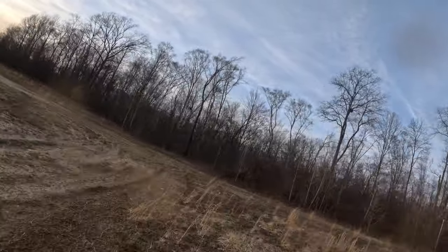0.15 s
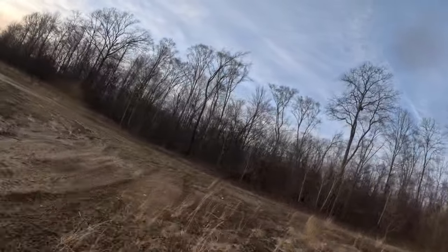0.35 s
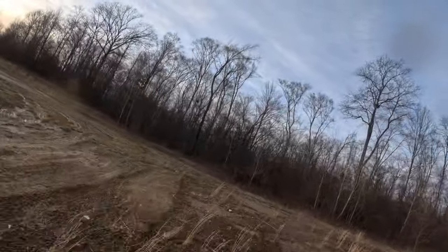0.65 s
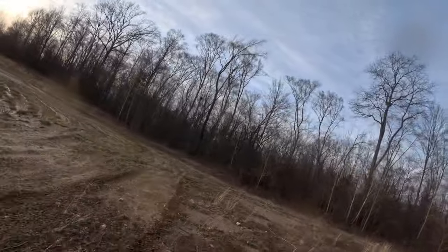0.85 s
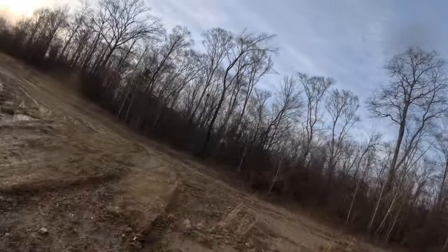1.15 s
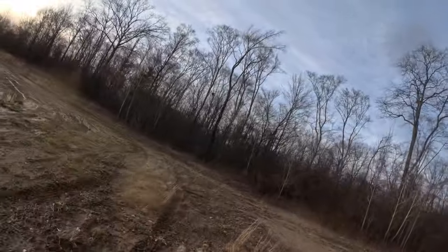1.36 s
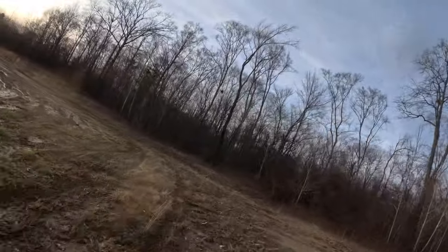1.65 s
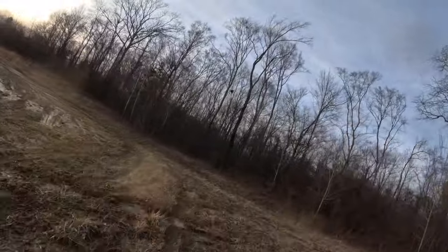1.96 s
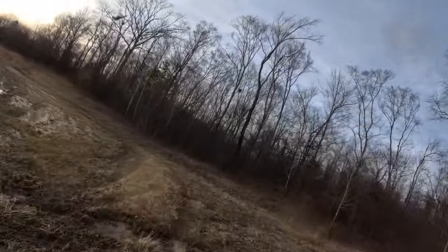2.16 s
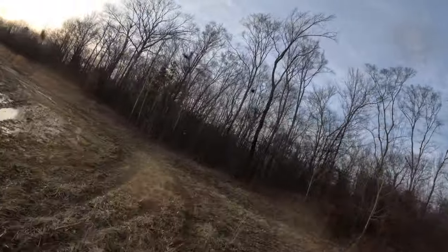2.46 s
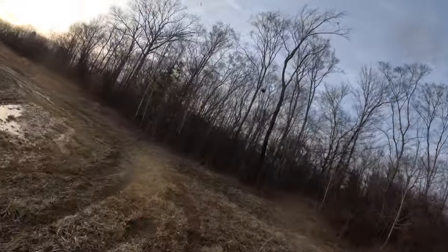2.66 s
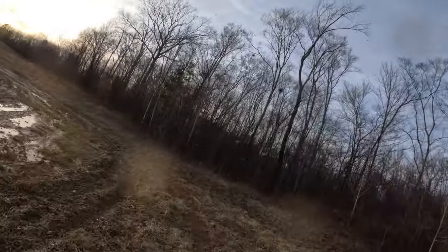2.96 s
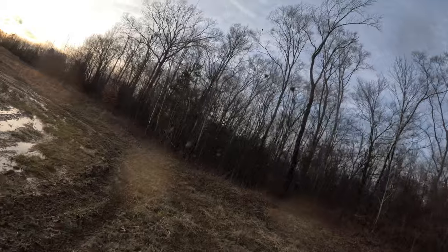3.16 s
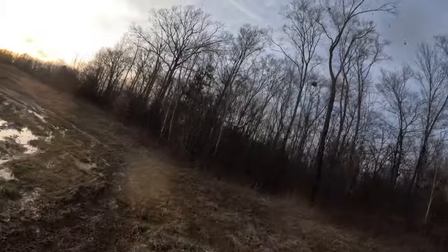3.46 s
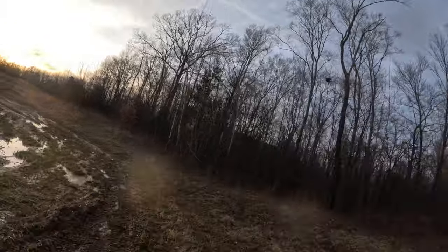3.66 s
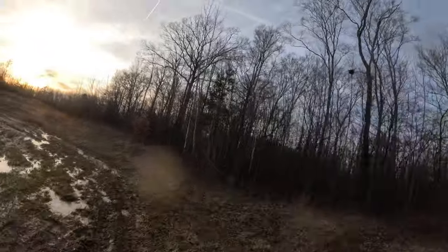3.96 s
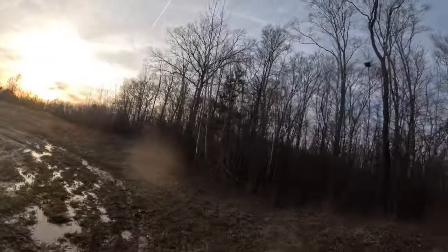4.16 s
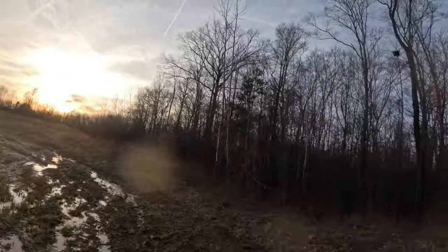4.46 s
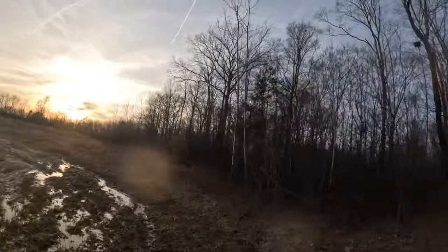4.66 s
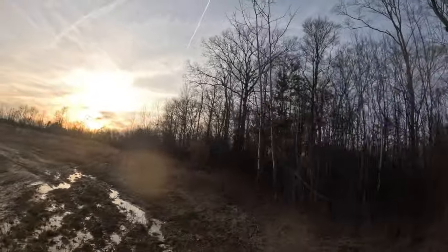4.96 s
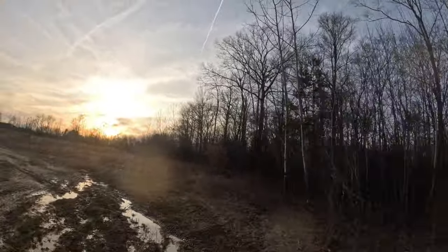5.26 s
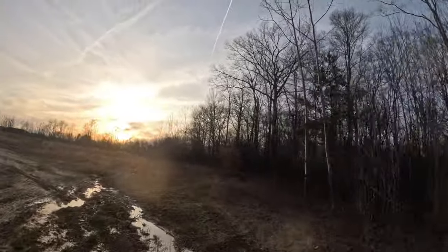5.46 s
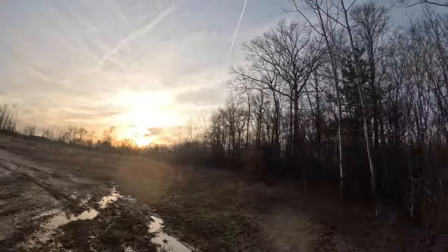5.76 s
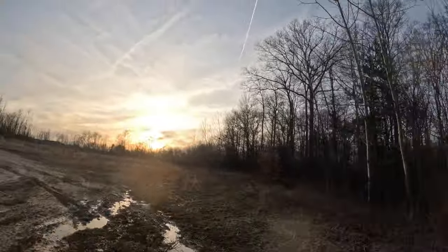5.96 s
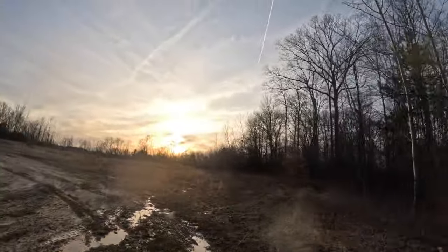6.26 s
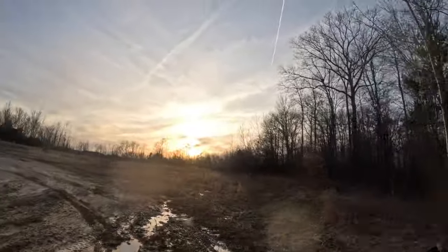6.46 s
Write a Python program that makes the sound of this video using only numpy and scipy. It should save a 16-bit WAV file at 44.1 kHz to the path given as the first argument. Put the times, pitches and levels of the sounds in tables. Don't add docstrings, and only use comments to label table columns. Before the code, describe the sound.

Close, dull onboard sound of a small twin-cylinder off-road vehicle outdoors. Its coarse, airy growl sags in pitch over the first two seconds, recovers slightly around three, then drifts lower. Ruts bring bursts of panel rattle, dry taps and low chassis thuds; a drive belt chirps faintly. A faint tyre hum comes midway, with thin wet spray later, over lumpy wind rumble.

```python
import sys
import numpy as np
from scipy import signal
from scipy.fft import rfft, irfft, next_fast_len
from scipy.io import wavfile
from scipy.ndimage import uniform_filter1d, map_coordinates

SR = 44100
rng = np.random.default_rng(int(sys.argv[2]) if len(sys.argv) > 2 else 0)


def generate_wav(signal):
    frames = np.transpose(np.atleast_2d(signal))
    scaled = np.clip(frames, -1, 1) * 32767
    pcm = np.round(scaled).astype(np.int16)
    wavfile.write(sys.argv[1], SR, pcm)


def field_ratio(decibels):
    return 10 ** (np.asarray(decibels, dtype=float) / 20)


N = 291942

# time in seconds, pace in dB.
PACE = [(0, 6.5), (.13, 5.5), (.45, 4.5), (.8, 2.5), (1.25, 2.5), (1.6, -0.5), (2.15, 0.5), (2.3, -.5),
        (3.3, -2), (3.75, -3), (4.3, -3), (4.8, -4), (5.4, -2.5), (6.1, -3.5), (6.45, -4.5), (6.62, -4)]


def unit(x):
    return x / np.sqrt(np.mean(x ** 2) + 1e-20)


def curves(rows):
    s, *columns = np.transpose(rows)
    return [np.interp(np.arange(N) / SR, s, column) for column in columns]


def swells(rows):
    t = np.arange(N) / SR
    total = 0
    for middle, length, height in rows:
        total = total + height * np.exp(-np.abs(2 * (t - middle) / length) ** 3)
    return total


def wobble(rate):
    knots = rng.standard_normal(int(N * 40 / SR) + 4)
    return map_coordinates(knots, [np.arange(N) * min(rate, 40) / SR])


def tone(hz):
    return 2 * np.pi * np.cumsum(hz) / SR


def thud(t, hz, peak_s):
    envelope = t / peak_s * np.exp(1 - t / peak_s)
    return envelope * np.sin(2 * np.pi * hz * t)


def band(x, low_hz, high_hz):
    sos = signal.butter(2, [low_hz, high_hz], "bandpass", fs=SR, output="sos")
    return signal.sosfilt(sos, x)


def shaped(x, spectrum, peaks=()):
    m = next_fast_len(N + 8192)
    hz = np.fft.rfftfreq(m, 1 / SR)
    f, db = np.transpose(spectrum)
    shape_db = np.interp(np.log(hz + 1), np.log(f + 1), db)
    for centre, width, lift_db in peaks:
        shape_db += lift_db / (1 + (2 * (hz - centre) / width) ** 2)
    return irfft(rfft(x, m) * field_ratio(shape_db), m)[..., :N]


def coloured(x, spectrum, peaks=()):
    return unit(shaped(x, spectrum, peaks))


def patchy(patchy_db):
    z = signal.stft(rng.standard_normal(N), nperseg=512)[2]
    field = uniform_filter1d(rng.standard_normal(z.shape), size=7, axis=0)
    field = uniform_filter1d(field, size=8, axis=1)
    return signal.istft(z * field_ratio(patchy_db * unit(field)), nperseg=512)[1][:N]


def grains(share):
    size = field_ratio(3.5 * np.minimum(rng.exponential(size=N), 4.5))
    struck = rng.random(N) < .08
    return patchy(1.5) + share * unit(rng.standard_normal(N) * size * struck)


def shake_db():
    # middle in seconds, length in seconds, change in dB.
    gusts = [(.08, 0.12, -8), (.3, 0.28, 0), (.5, .1, -1), (.86, 0.092, -6), (1.71, .08, 6),
             (1.92, 0.13, 4.5), (2.13, 0.15, 5.5), (2.6, .1, 1), (2.85, 0.33, -2.5), (3.1, .08, -3),
             (3.45, 0.36, 3), (4.38, 0.22, -5), (4.58, 0.09, 3), (4.9, 0.12, 3.5), (5.05, .1, 2.5),
             (5.25, 0.26, 0), (5.66, 0.16, -17), (6.13, 0.16, -21), (6.28, .12, -3)]
    return -28.5 + 1.1 * curves(PACE)[0] + swells(gusts)


def jolts():
    # start in seconds, length in seconds, jolt in dB.
    ruts = [(0, 0.026, -1), (0.128, .06, 5), (0.713, 0.16, 4), (0.987, 0.09, 6), (1.155, .05, 4.5),
            (1.303, .06, 3), (1.422, 0.043, 5), (1.634, .11, 6.5), (2.017, 0.12, 5), (2.127, 0.12, 2),
            (2.345, 0.081, 7), (2.508, .11, 9.5), (2.7, 0.079, 7), (2.834, 0.081, 4.5), (3.019, .08, 4.5),
            (3.248, 0.08, 4.5), (3.336, 0.092, 5.5), (3.767, 0.12, 8), (3.896, 0.11, 7), (3.964, .05, 1.5),
            (4.08, .06, 1.5), (4.288, .14, 3.5), (4.566, 0.17, 3), (4.856, .12, 3.5), (5.04, 0.26, 3),
            (5.24, 0.13, 2.5), (5.938, 0.037, 2), (6.057, 0.092, 2.5)]
    t = np.arange(N) / SR
    rise_s = 0.01
    total = 0
    for start, length, jolt_db in ruts:
        hit = (1 + np.tanh((t - start) / rise_s)) / 2
        let_go = np.exp(-np.clip((t - start) / length, 0, 9) ** 3)
        total = total + jolt_db * hit * let_go
    return total


def buffeting():
    # pitch in Hz, level in dB.
    shake = [(3, -18.5), (6, -8), (27, -5), (55, 1.5), (80, 0.5), (125, -4), (160, -10.5), (230, -13.5),
             (400, -38.5), (2000, -78), (9000, -140)]
    lumps = field_ratio(1.6 * wobble(9))
    return field_ratio(shake_db() + 4.5) * coloured(lumps * rng.standard_normal(N), shake)


def tyres():
    # time in seconds, pitch in Hz, level in dB.
    tread = [
        (2.3, 385, -70),
        (2.6, 385, -37),
        (3, 398, -40.5),
        (3.6, 399.4, -35.5),
        (4, 380, -39.5),
        (4.6, 378.6, -36.5),
        (5.3, 368, -46),
        (5.7, 356.3, -48.5),
        (5.9, 365, -64.5),
    ]
    # time in seconds, spray in dB.
    wet = [
        (0, -100),
        (3.2, -85.5),
        (3.84, -91),
        (3.93, -80.5),
        (4.3, -74.5),
        (5.0, -74),
        (6.62, -75),
    ]
    # middle in seconds, length in seconds, extra spray in dB.
    puddles = [
        (3.42, .33, 12),
        (4.65, .15, 1),
        (5.19, .16, 3.5),
        (6.1, 0.11, 4),
    ]
    # pitch in Hz, level in dB.
    mist = [(10800, -34.5), (11400, -17.5), (11700, -5.5), (12200, -7), (12800, -4.5), (13200, -12.5),
            (14800, -21.5), (15700, -34)]
    hz, hum_db = curves(tread)
    hum = field_ratio(hum_db + 2.3 * wobble(6)) * np.sin(tone(hz) + 0.35 * wobble(6.3))
    spray_db = curves(wet)[0] + swells(puddles) + 24 + 1.2 * wobble(14)
    return hum + field_ratio(spray_db) * coloured(patchy(1.5), mist)


def rattle():
    # pitch in Hz, level in dB.
    panel_colour = [(290, -28), (500, -8), (900, -5), (1500, -6.5), (2720, -13.5), (4000, -15.5),
                    (5640, -23.5), (7300, -28), (8300, -51.5), (16000, -110)]
    # pitch in Hz, level in dB.
    grit_colour = [(6500, -29.5), (7600, -3), (8300, -5), (10000, -0.5), (11000, -6), (12500, -5),
                   (13300, -19), (14200, -48), (15700, -88.5)]
    jolt_db, tremble = jolts(), wobble(30)
    panel_db = -50 + 0.4 * curves(PACE)[0] + jolt_db + 0.72 * tremble + 11.5
    grit_db = -78 + 0.63 * jolt_db + 1.2 * tremble + 23
    panels = field_ratio(panel_db) * coloured(grains(share=0.35), panel_colour)
    grit = field_ratio(grit_db) * coloured(grains(share=0.38), grit_colour)
    return panels + grit


def clods():
    # time in seconds, peak in dB, ring in Hz, bright part in
    # dB.
    hits = [(0.002, -33, 2990, -40.5), (0.9426, -30, 2360, -51), (1.1159, -29, 2239, -70.5),
            (1.311, -29.5, 4600, -72), (1.326, -27.5, 4700, -68), (1.341, -21, 2570, -48),
            (1.422, -35.5, 2514, -52), (2.0224, -16.5, 2698, -62), (2.027, -24, 2600, -66),
            (2.059, -25, 2520, -73), (2.095, -30, 2400, -72), (2.164, -29, 2200, -57),
            (2.346, -33, 2350, -75), (2.705, -26, 2690, -63), (2.8599, -26, 2200, -67),
            (3.258, -26, 2160, -64.5), (3.7568, -40, 2580, -68), (3.9896, -24.5, 2980, -71),
            (4.83, -34, 3500, -73), (4.87, -32, 2900, -72), (4.955, -25.5, 3220, -67),
            (5.0407, -27, 2350, -60.5), (5.046, -26, 3200, -70), (5.162, -30, 3274, -70),
            (5.1834, -25.5, 3150, -64), (5.2635, -23, 2755, -61), (5.318, -29, 3330, -64)]
    ring, crack = np.zeros(N + SR), np.zeros(N + SR)
    t = np.arange(SR // 10) / SR
    for s, peak_db, hz, bright_db in hits:
        place = slice(round(s * SR), round(s * SR) + len(t))
        burst = (1 - np.exp(-t / 0.0015)) * rng.standard_normal(len(t))
        tap = field_ratio(peak_db + 4 - 60 * t / 0.045) * burst
        ring[place] += field_ratio(peak_db - 4) * thud(t, hz, .0007)
        ring[place] += band(tap, .8 * hz, 1.35 * hz)
        crack[place] += field_ratio(bright_db + 31.5 - 60 * t / 0.01) * burst
    crack = band(band(crack, 6500, 13000), 6500, 13000)
    return (ring + crack)[:N]


def knocks():
    # time in seconds, peak in dB, ring in Hz.
    blows = [(1.676, -20, 700), (1.694, -17, 560), (1.704, -13, 637), (1.718, -18, 590),
             (1.834, -14.5, 573), (3.031, -33, 592), (3.255, -29, 500), (3.391, -23, 600),
             (3.785, -17, 974), (4.296, -20.5, 1140), (4.333, -26, 592), (4.419, -18, 826),
             (4.484, -22, 509), (4.579, -31, 616), (4.913, -21.5, 1420), (5.159, -25, 605),
             (5.253, -30, 549), (4.575, -22, 1500), (5.12, -24, 1450), (5.293, -18, 1170), (5.37, -23, 945)]
    out = np.zeros(N + SR)
    t = np.arange(SR // 10) / SR
    for s, peak_db, hz in blows:
        out[round(s * SR):][:len(t)] += field_ratio(peak_db - 6.5) * thud(t, hz, 0.0018)
    return out[:N]


def belt():
    # middle in seconds, length in seconds, pitch in Hz, level in dB.
    slips = [
        (.1, 0.46, 1000, -44),
        (1.809, 0.13, 1110, -42.5),
        (2.12, .36, 990, -41.5),
        (3.38, 0.44, 1097, -43.5),
        (4.149, .1, 1010, -43.5),
        (6.434, 0.43, 1100, -43.5),
    ]
    t = np.arange(N) / SR
    song = 0
    for s, length, hz, db in slips:
        note = np.exp(2j * np.pi * hz * t) + 0.16 * np.exp(3 * 2j * np.pi * hz * t)
        song = song + swells([(s, length, field_ratio(db))]) * note
    fuzz = np.exp(2.6j * wobble(40))
    return field_ratio(3.2 * wobble(35)) * np.sqrt(2) * np.imag(song * fuzz)


def exhaust_boom(hz, boom_db, phase, rough):
    # multiple of firing rate, level in dB, drift in dB.
    half_orders = [
        (1.5, -48.5, 6.5),
        (2.5, -58.5, 2.5),
    ]
    # pitch in Hz, level in dB.
    pipe = [(177, -47), (183, -29), (197, -26.5), (215, -32.5), (235, -44), (270, -36.5), (292, -37),
            (320, -47),
            (342, -39.5), (385, -53), (420, -44), (450, -45.5), (490, -52), (540, -46), (580, -49),
                 (700, -53.5)]
    # middle in seconds, length in seconds, overtone change in dB.
    throttle = [(.7, .3, 3), (1.3, 0.15, 3), (1.56, 0.36, -8), (1.85, .2, 3.5), (2.08, .22, 5),
                (2.27, 0.18, -8.5), (2.65, 0.97, 2), (3.45, .15, -5.5), (4.3, .3, 0.5), (4.72, 0.2, -3),
                (5.25, 0.51, 2), (5.7, 0.27, -2), (6.08, 0.087, -10), (6.35, .3, 0)]
    # middle in seconds, length in seconds, change in dB.
    stumbles = [
        (.57, 0.049, -11),
        (.92, 0.029, -5),
        (1.79, 0.027, -21),
        (2.13, .04, -11),
        (2.18, 0.039, -3),
        (2.48, .03, -8),
    ]
    pipe_hz, pipe_level = np.transpose(pipe)
    throttle_db = swells(throttle)

    def pipe_db(k):
        return np.interp(k * hz, pipe_hz, pipe_level) + throttle_db * (1 if k == 2 else 0.15)

    lines = field_ratio(boom_db + swells(stumbles) + 0.63 * rough * wobble(22)) * np.sin(phase)
    second_db = pipe_db(2) + (1.2 + 1.2 * rough) * wobble(14)
    lines += field_ratio(second_db) * np.sin(2 * phase + .25 * rough * wobble(18))
    lines += field_ratio(pipe_db(3) + 2.4 * wobble(11)) * np.sin(3 * phase + .3 * wobble(16))
    lines += field_ratio(shake_db() - 21.5 + 2.2 * wobble(4.9)) * np.sin(phase / 2)
    for k, db, drift_db in half_orders:
        lines += field_ratio(db + drift_db * wobble(5)) * np.sin(k * phase + rng.uniform(0, 2 * np.pi))
    for k in range(4, 7):
        lines += field_ratio(pipe_db(k) + 2.5 * wobble(7)) * np.sin(k * phase + rng.uniform(0, 2 * np.pi))
    return np.sqrt(2) * lines


def roar_and_intake(phase, pace_db):
    # pitch in Hz, level in dB.
    roar_colour = [(70, -30), (120, -4), (160, -9), (340, -9), (770, -15.5), (1770, -27.5), (3500, -36.5),
                   (6500, -44.5), (8000, -70), (16000, -120)]
    # pitch in Hz, level in dB.
    intake_colour = [(500, -32.5), (900, -1.5), (1800, -0.5), (3400, -6.5), (3900, -24.5), (6500, -29),
                     (8000, -66), (16000, -120)]
    # pitch in Hz, width in Hz, lift in dB.
    panel_peaks = [(540, 90, 5.5), (1015, 250, 10), (1480, 140, 6.5), (2160, 91, 6.5), (3220, 130, 8)]
    jolt_db = jolts()
    puff = 1 + 0.12 * np.sin(phase)
    roar_db = -31.5 + 0.97 * pace_db + 0.12 * jolt_db + 2 + 0.98 * wobble(12)
    intake_db = -40 + 2.03 * pace_db + 0.21 * jolt_db + 0.61 * wobble(23)
    roar = field_ratio(roar_db) * coloured(puff * patchy(0.5), roar_colour)
    intake = field_ratio(intake_db) * coloured(puff * patchy(0.47), intake_colour, panel_peaks)
    return roar + intake


def engine():
    # time in seconds, firing rate in Hz, boom in dB.
    firing = [(0.0, 115.5, -16.5), (0.15, 118.2, -19), (0.6, 112.4, -18.5), (1.05, 107, -16.5),
              (1.35, 98.6, -17.5), (1.65, 97.5, -15), (2.1, 91.9, -19), (2.25, 95.04, -16),
              (2.7, 98.1, -14), (3.05, 107.6, -13.5), (3.6, 104, -15), (4.05, 98.6, -13.5),
              (4.5, 101.6, -13), (5.1, 93.95, -15.5), (5.55, 91, -13.5), (6.0, 88.7, -12), (6.3, 98.9, -13),
              (6.62, 95.55, -15)]
    hz, boom_db = curves(firing)
    pace_db = curves(PACE)[0]
    rough = np.clip(field_ratio(pace_db - 1.5), .2, 2)
    phase = tone(hz) + 0.058 * rough * wobble(25)
    return exhaust_boom(hz, boom_db, phase, rough) + roar_and_intake(phase, pace_db)


def scene():
    return (buffeting() + tyres() + rattle() + clods() + knocks() + belt() + engine())[None]


def top_cut(x):
    return signal.sosfilt(signal.butter(12, 15720, fs=SR, output="sos"), x)


def record(dry):
    # pitch in Hz, level in dB.
    housing = [(6600, -0.5), (7200, -5.5), (7700, -17), (16000, -23)]
    held = dry / (1 + np.abs(dry / 0.56) ** 6) ** (1 / 6)
    return top_cut(shaped(held, housing))


dry = scene()
out = record(dry)
generate_wav(out)
```